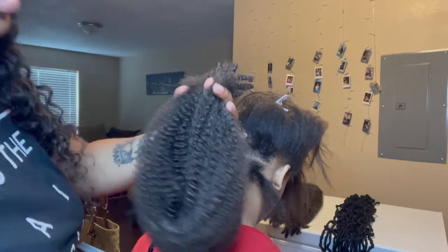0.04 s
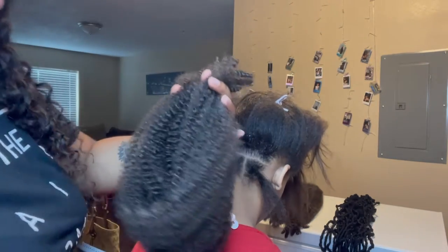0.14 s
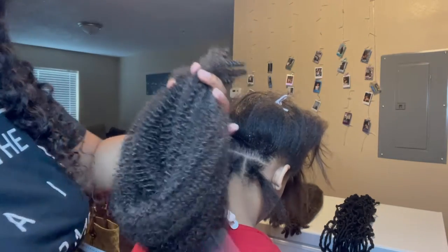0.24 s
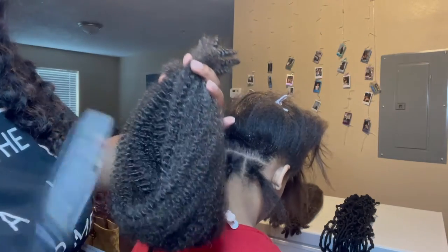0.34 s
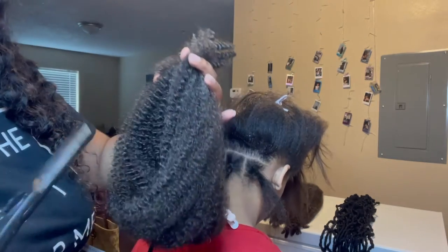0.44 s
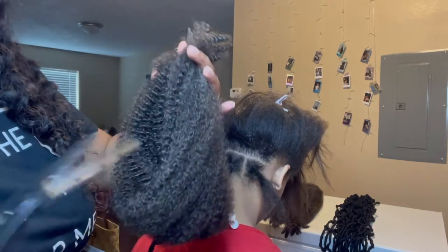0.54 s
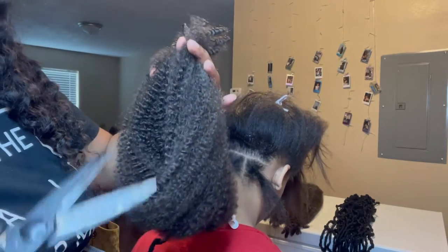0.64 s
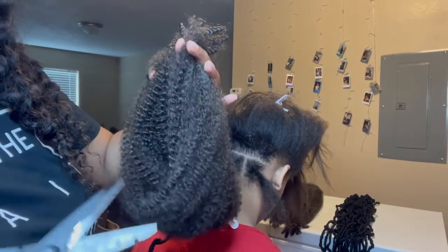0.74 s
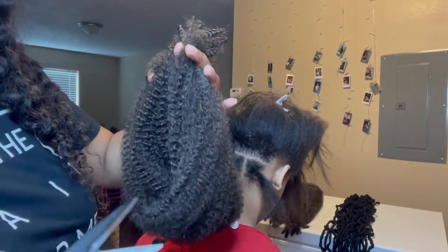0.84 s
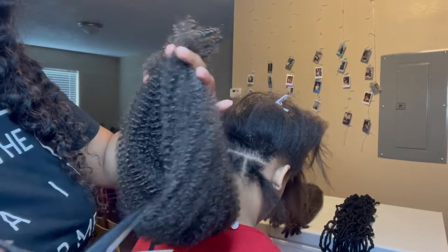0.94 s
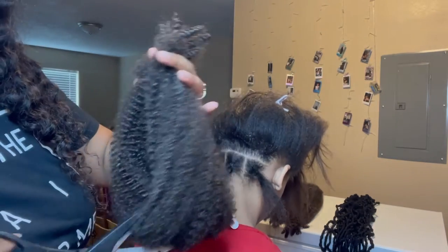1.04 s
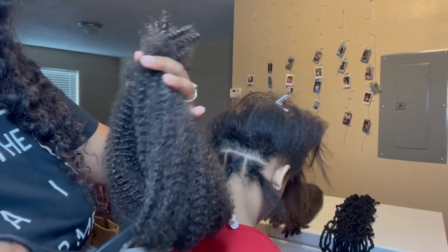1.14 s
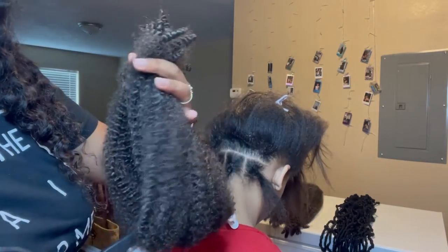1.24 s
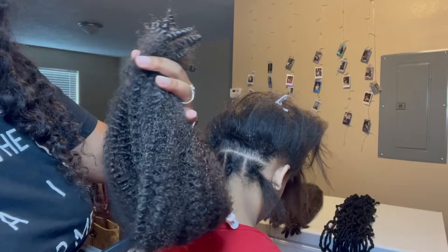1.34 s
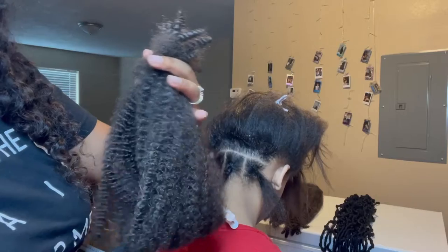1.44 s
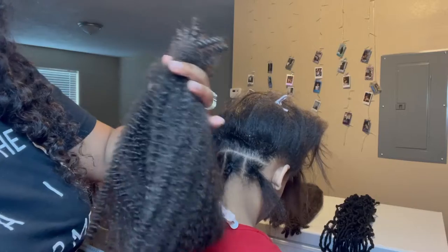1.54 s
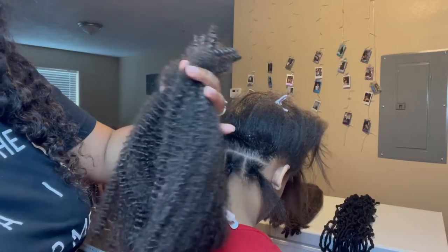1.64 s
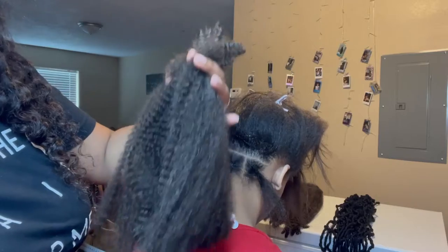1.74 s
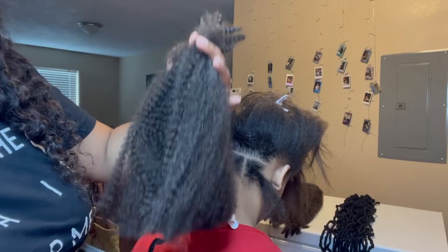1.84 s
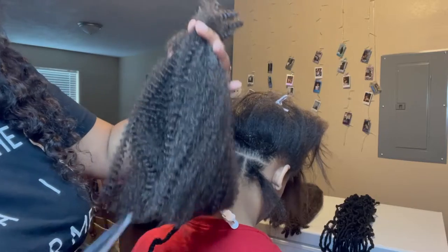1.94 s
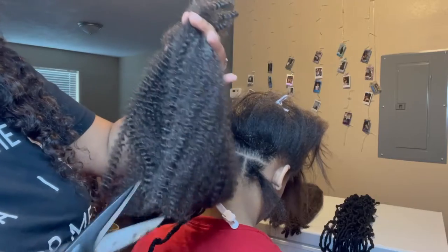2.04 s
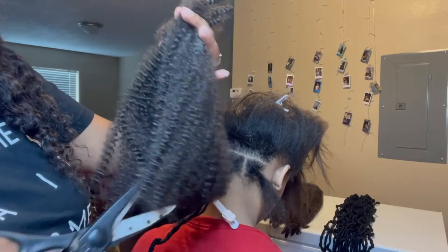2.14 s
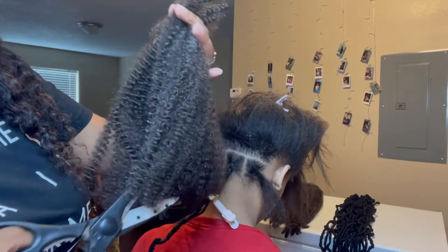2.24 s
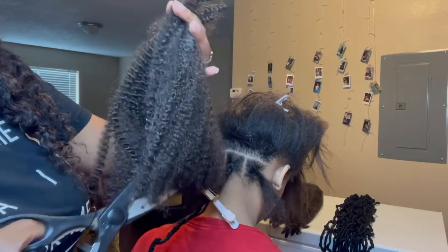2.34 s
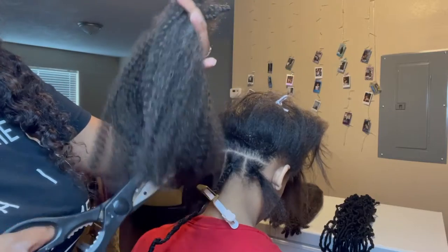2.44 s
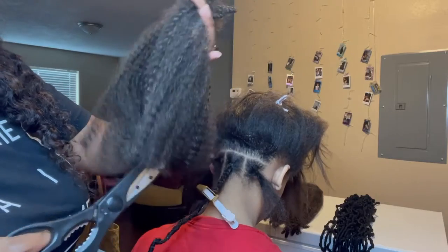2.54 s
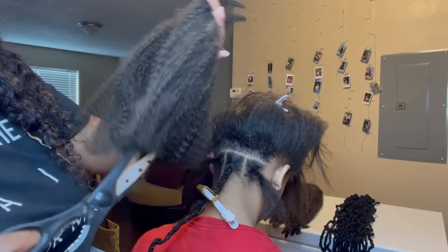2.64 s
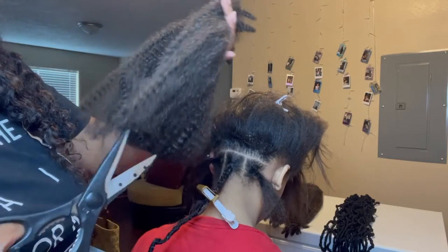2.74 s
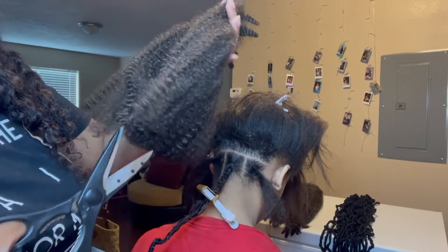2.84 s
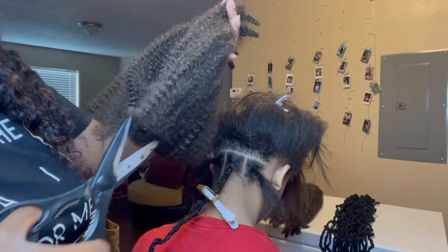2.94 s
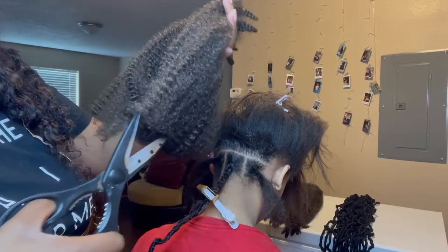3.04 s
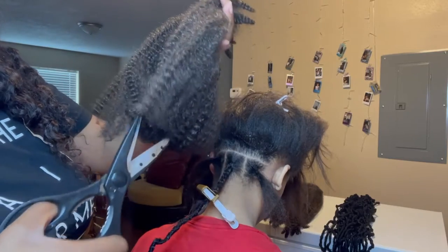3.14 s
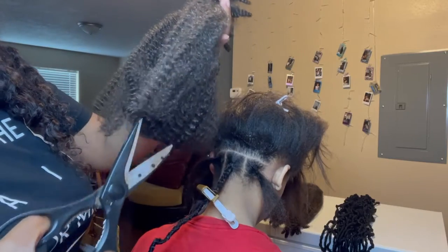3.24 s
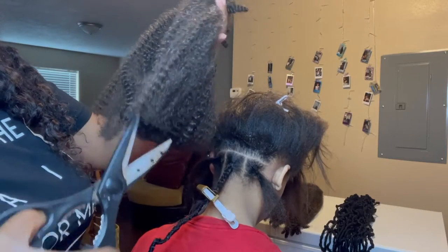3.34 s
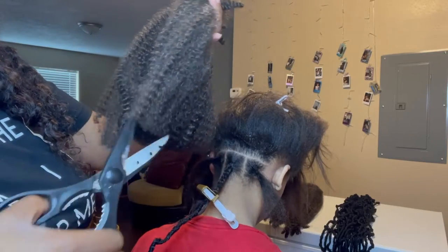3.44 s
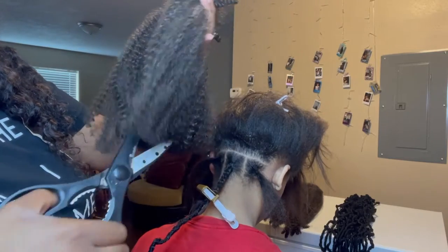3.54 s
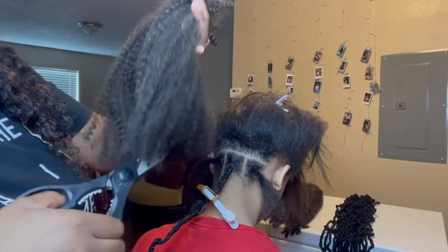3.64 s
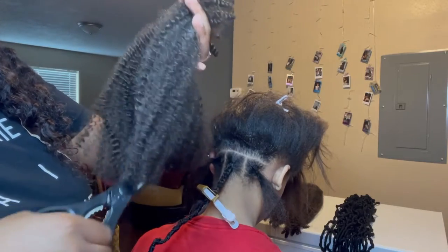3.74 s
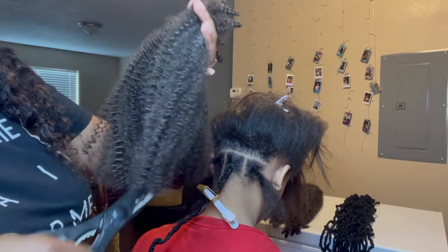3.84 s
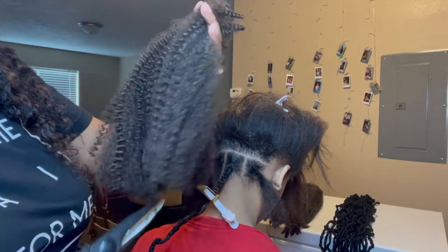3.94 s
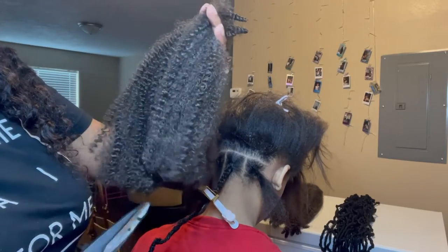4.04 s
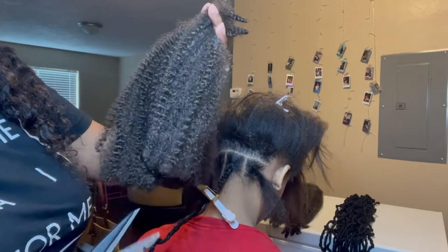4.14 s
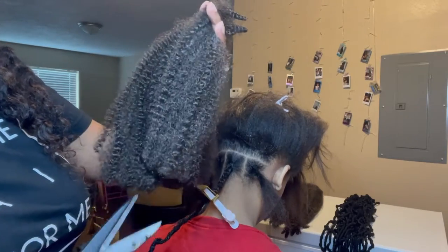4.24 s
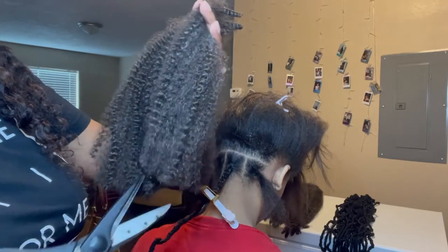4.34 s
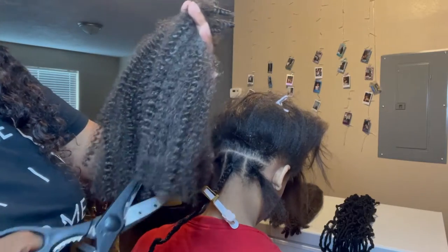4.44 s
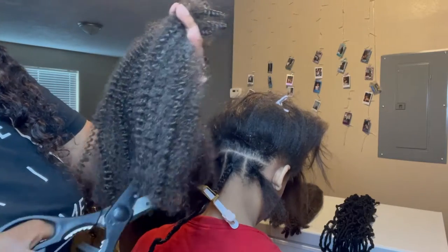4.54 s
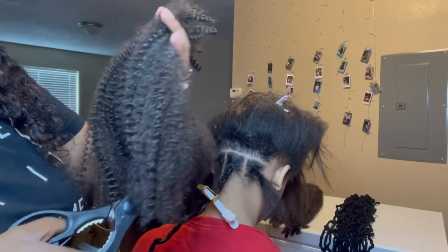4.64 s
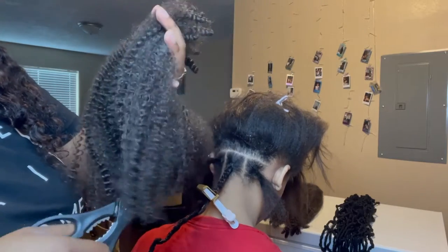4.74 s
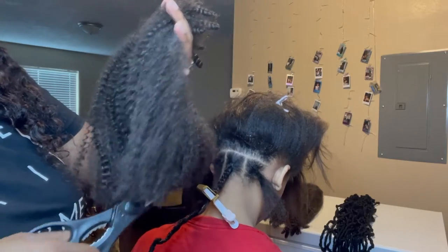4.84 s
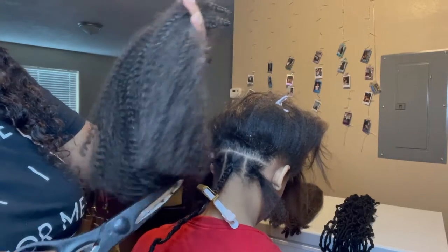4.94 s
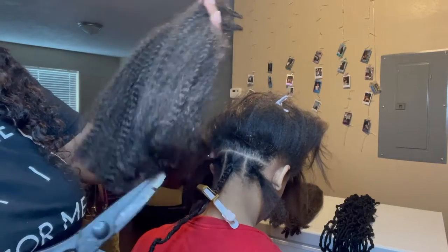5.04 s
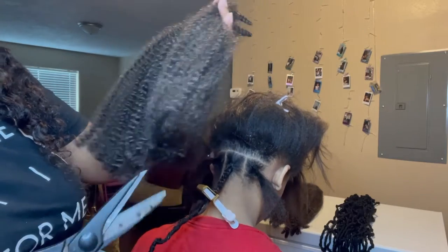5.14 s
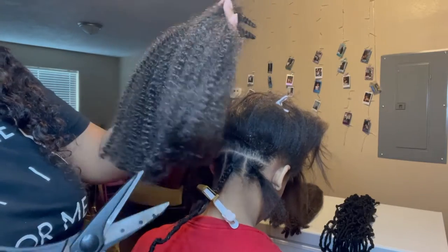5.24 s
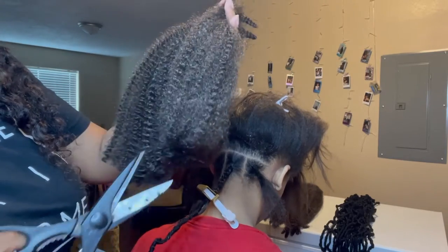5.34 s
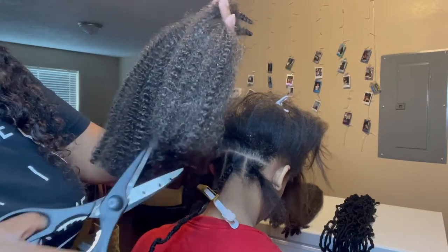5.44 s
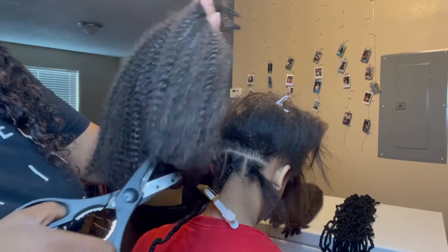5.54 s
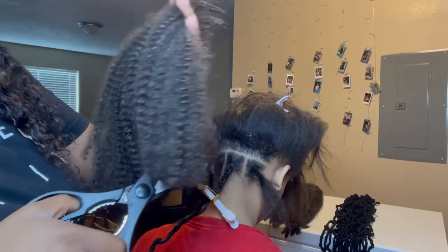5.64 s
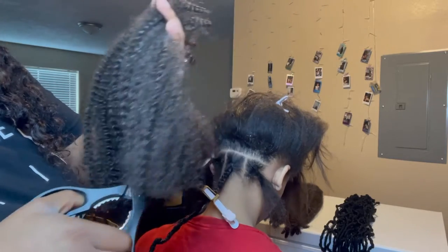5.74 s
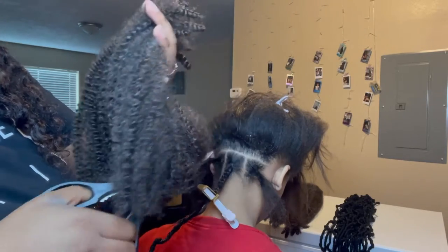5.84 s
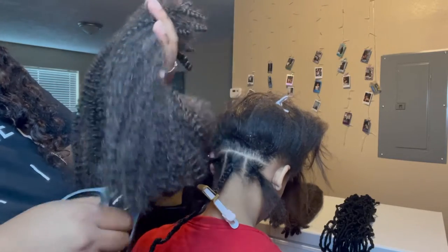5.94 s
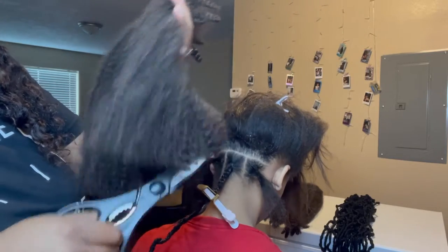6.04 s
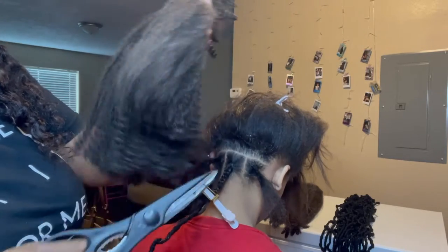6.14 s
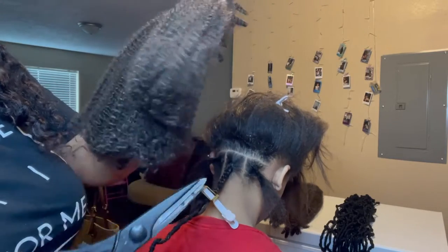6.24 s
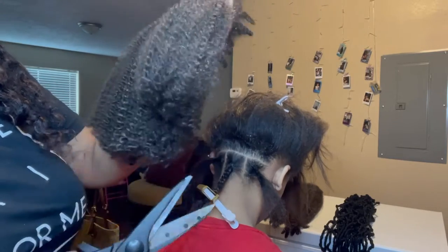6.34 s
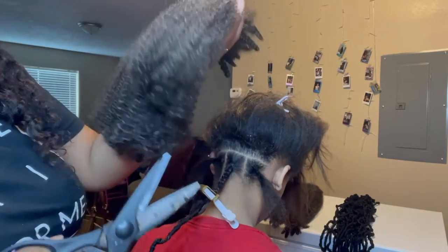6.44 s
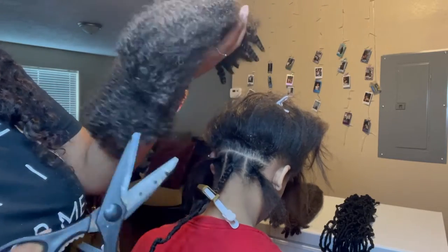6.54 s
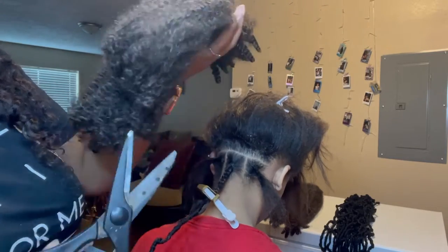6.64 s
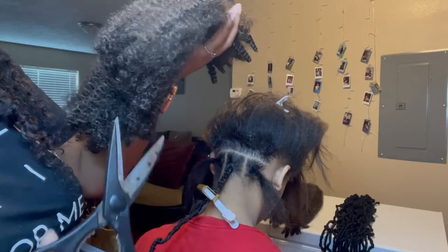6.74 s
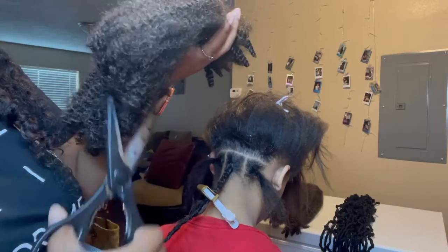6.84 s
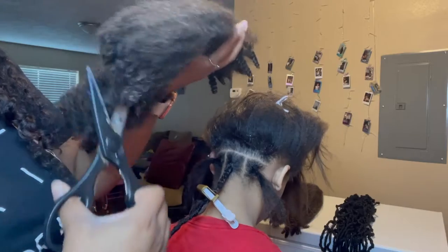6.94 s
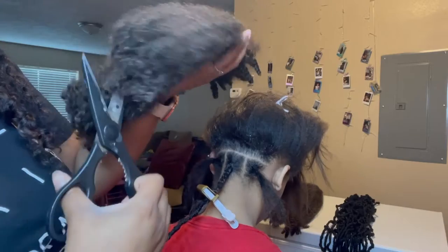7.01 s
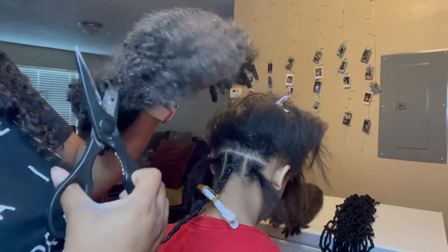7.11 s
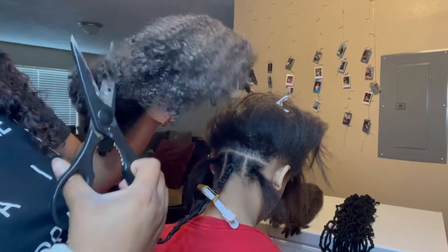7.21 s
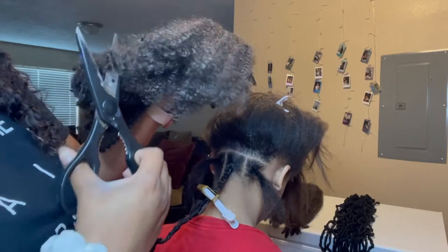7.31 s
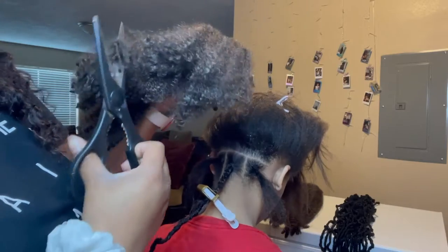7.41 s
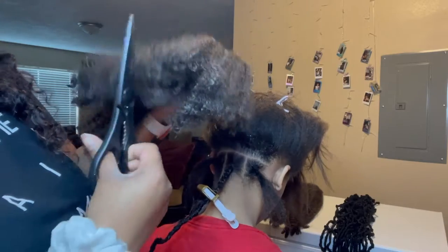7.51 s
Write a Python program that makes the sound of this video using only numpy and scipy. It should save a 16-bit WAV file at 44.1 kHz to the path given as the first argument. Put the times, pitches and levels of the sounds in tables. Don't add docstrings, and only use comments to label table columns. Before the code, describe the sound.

Scissors crunch slowly through a thick bundle of synthetic hair, each cut ending in a sharp steel snap, over faint unsteady hum indoors.

```python
import sys
import numpy as np
from scipy import signal
from scipy.fft import rfft, irfft, next_fast_len
from scipy.io import wavfile
from scipy.ndimage import uniform_filter1d

SR = 44100
rng = np.random.default_rng(int(sys.argv[2]) if len(sys.argv) > 2 else 0)


def magnitude_from_level(level_db):
    exponent = np.asarray(level_db, float) / 20
    return 10 ** exponent


def store_wav(level_fs):
    pcm = np.round(np.clip(np.atleast_2d(level_fs), -1, 1) * 32767)
    wavfile.write(sys.argv[1], SR, pcm.T.astype(np.int16))


N = 333837

PORT_LEAD_S = 0.0001716
# [t/s, scrape level/dB, handle body rel. level/dB]
REOPENINGS = [
    (1.7056, -53, -13),
    (4.0606, -51, -21.5),
    (5.0596, -52.5, -9),
    (6.242, -56, -11.5),
]
# [t/s, crack level/dB, knock rel. level/dB, ring f/Hz, ring level/dB]
CLOSINGS = [
    (1.53, -3, -20, 7613, -4),
    (3.874, -4, -18.5, 7500, 3),
    (4.8654, 1.5, -20.5, 7715, 3.5),
    (6.0157, 1.5, -22.5, 7640, -0.5),
    (7.458, -5.5, -20, 6150, 5.5),
]


def unit(x):
    return x / np.sqrt(np.mean(x ** 2) + 1e-20)


def along(points, hz):
    f, v = np.transpose(points)
    return np.interp(np.log(hz + 1), np.log(f + 1), v)


def curve(points):
    t_s, v = np.transpose(points)
    return np.interp(np.arange(N) / SR, t_s, v)


def wobble(rate_hz):
    knots = rng.standard_normal(int(N * rate_hz / SR) + 2)
    return np.interp(np.arange(N) * rate_hz / SR, np.arange(len(knots)), knots)


def filtered(x, response):
    m = next_fast_len(x.shape[-1] + 4096, True)
    return irfft(rfft(x, m) * response(np.fft.rfftfreq(m, 1 / SR)), m)[..., :x.shape[-1]]


def modes(table):
    def response(f):
        total = 0
        for k, (centre, width, db) in enumerate(table):
            damping = 1j * f * width
            total = total + (-1) ** k * magnitude_from_level(db) * damping / (centre * centre - f * f + damping)
        return total
    return response


def hiss(spectrum):
    return filtered(rng.standard_normal((2, N)), lambda hz: magnitude_from_level(along(spectrum, hz)) * np.sqrt(SR / 2))


def crackle(spread_db, clump_db, patchy_db):
    sizes = magnitude_from_level(spread_db * rng.exponential(size=N) + clump_db * wobble(350))
    z = signal.stft(rng.standard_normal((2, N)) * sizes, nperseg=128)[2]
    field = uniform_filter1d(rng.standard_normal(z.shape[1:]), size=3, axis=0)
    field = uniform_filter1d(field, size=9, axis=1)
    return signal.istft(z * magnitude_from_level(patchy_db * unit(field)), nperseg=128)[1][:, :N]


def shearing():
    # [full pressure t/s, held/s, first level/dB, last level/dB, body rel. level/dB]
    strokes = [(0, 0.11, -70, -76.5, -5), (.13, 0.013, -62, -68, -11.5), (.236, 0.16, -75, -83, -6),
               (1.2, 0.031, -73.5, -65, -11), (1.251, 0.065, -58, -45, -18),
               (1.914, 0.075, -92.5, -94, 22.5), (2.36, .035, -81, -85, -7),
               (2.621, 0.043, -71.5, -75, -10), (3.663, 0.066, -58, -57, -14),
               (3.738, 0.078, -48.5, -65, -11), (4.69, .03, -50.5, -51.5, -17.5),
               (4.72, 0.15, -48.5, -46.5, -17), (5.883, .046, -51, -48, -12),
               (5.968, .03, -63.5, -60.5, -17), (6.481, .04, -82, -85, -3), (6.65, 0.48, -100, -101, 20.5),
               (7.36, 0.039, -80, -63.5, -18), (7.42, 0.027, -48.5, -44.5, -16)]
    bite_db_per_s, spring_db_per_s, let_go_db_per_s = 698, 2200, 290
    t = np.arange(N) / SR
    bright, low = np.zeros(N), np.zeros(N)
    pressed = [(*row, bite_db_per_s) for row in strokes]
    pressed += [(s, 0, db, db, body_db, spring_db_per_s) for s, db, body_db in REOPENINGS]
    for s, held_s, first_db, last_db, body_db, onset_db_per_s in pressed:
        end = s + max(held_s, .001)
        levels_db = [first_db - onset_db_per_s, first_db, last_db, last_db - let_go_db_per_s]
        gain = magnitude_from_level(np.interp(t, [s - 1, s, end, end + 1], levels_db))
        bright += gain ** 2
        low += gain * magnitude_from_level(body_db)
    return bright, magnitude_from_level(-16) ** 2 * bright, low


def giving_way():
    # [t/s, level/dB, rise/ms, fall/ms]
    slips = [(0.1435, -61, 50, 11), (1.2213, -58.5, 4.9, 5.1), (1.3064, -41, 8.3, 7.6),
             (1.3378, -39.5, 5.6, 3.5), (1.371, -48, 4.8, 9.9), (1.721, -47, 20.4, 15),
             (3.6778, -56.5, 2.7, 9.9), (3.7455, -39, 15, 4.9), (3.7751, -42.5, 3.4, 7.0),
             (3.7935, -39.5, 6, 6.7), (4.7168, -36.5, 4.1, 13), (4.7426, -36.5, 3.6, 4.9),
             (4.7884, -48.5, 1.6, 9.1), (4.8252, -43.5, 9, 26), (5.8676, -52, 2.6, 27),
             (5.9346, -37, 28, 5.8), (6.2625, -47.5, 3.56, 13.6)]
    # [t/s, level/dB, dull rel. level/dB]
    ticks = [(0.7473, -47, -14), (1.1961, -67, -22), (1.3532, -43.5, -10), (1.4696, -56, -17),
             (1.4849, -35, -28), (1.5174, -24.5, -23.5), (2.606, -69, -3), (2.628, -69, 1),
             (3.8047, -38.5, -11), (4.688, -40, -34), (4.7792, -42, -9.5), (5.522, -68, -2),
             (5.885, -45, -13.5), (1.39, -52.5, -14.5), (1.288, -46, -19.5), (1.3, -38.5, -19),
             (4.68, -52.5, -20), (6.5254, -63, -10), (6.5746, -66, -24), (6.702, -60, -14),
             (7.357, -68.5, -16), (7.406, -52.5, -25), (7.3863, -56.5, -26)]
    # [t/s, level/dB, rise/ms, fall/ms, dull rel. level/dB]
    rush = [
        (0, -69, 1, 160, 1.5),
        (0.469, -35.5, 1.7, 2.7, -5.5),
        (.478, -30.5, 5.2, 4, -13.5),
        (0.499, -45.5, 5.5, 7.5, -7),
        (1.318, -35, 3.36, 4.4, -21),
        (2.682, -63.5, 10.8, 9, -18),
        (3.859, -32, 4.1, 4.05, -21.5),
        (6.0, -39.5, 1.76, 3.6, -17),
    ]
    # [t/s, level/dB, rise/ms]
    last = [
        (1.53, -15.5, 2.46),
        (3.872, -19.5, 9),
        (4.8654, -15.5, 5.4),
        (6.0152, -13, 4.7),
        (7.454, -21.5, 5),
    ]
    slip_dull_db, shake_db = -14, -13.5
    catches = [(*row, slip_dull_db) for row in slips]
    catches += [(s, db, 1.3, 2.6, dull_db) for s, db, dull_db in ticks]  # rise/ms, fall/ms
    catches += [(s, db + 9, 6.2, 11.6, -6) for s, db, _ in REOPENINGS]
    rushes = rush + [(*row, 0.98, -22) for row in last]

    t = np.arange(N) / SR
    bright, dull, low = np.zeros((3, N))
    for table, abruptness in (catches, 2), (rushes, 1):
        for s, db, rise_ms, fall_ms, dull_db in table:
            near = slice(max(round((s - .1) * SR), 0), round((s + .1) * SR))
            ms = 1000 * (t[near] - s)
            before = np.abs(ms / max(rise_ms, .2)) ** abruptness
            after = ms / max(fall_ms, .2)
            shape = magnitude_from_level(db - 9.1 * np.where(ms < 0, before, after))
            bright[near] += shape ** 2
            dull[near] += (shape * magnitude_from_level(dull_db)) ** 2
            if abruptness > 1:
                low[near] += shape * magnitude_from_level(dull_db + shake_db)
    return bright, dull, low


def fibres():
    # [f/Hz, density/dB per Hz]
    fibre_spectrum = [(1200, -33.5), (2000, -16.5), (3400, -16), (5200, -7.5), (6500, -6.5), (8500, -3),
                      (11000, -7.5), (13300, -6.5), (15600, -2), (16200, -30)]
    # [f/Hz, width/Hz, level/dB]
    blades = [(2874, 310, -8.5), (4400, 1000, -13.5), (6500, 600, -5), (8273, 900, -8.5),
              (10600, 1000, -8.5), (13200, 1100, -9)]
    # [f/Hz, density/dB per Hz]
    dull_spectrum = [(1000, -28.5), (1800, -8), (2600, 0.5), (3600, -3), (5500, -21.5)]
    # [f/Hz, density/dB per Hz]
    body_spectrum = [(200, -29.5), (400, 0), (750, -7.5), (1150, -13.5), (1700, -0.5), (2400, -25.5)]
    bright, dull, low = [slow + quick for slow, quick in zip(shearing(), giving_way())]
    grains = crackle(spread_db=3, clump_db=2.7, patchy_db=4.0)
    steel = unit(filtered(grains, lambda hz: magnitude_from_level(along(fibre_spectrum, hz)) * (1 + modes(blades)(hz))))
    blunt = unit(filtered(grains[:, ::-1], lambda hz: magnitude_from_level(along(dull_spectrum, hz))))
    body = unit(hiss(body_spectrum))
    return magnitude_from_level(-2.5) * (np.sqrt(bright) * steel + np.sqrt(dull) * blunt + low * body)


def snaps():
    # [t/s, crack level/dB, knock rel. level/dB, ring f/Hz, ring level/dB]
    pings = [ (0.478, -33.5, -26, 2400, -4), (0.748, -41.5, -20.5, 7840, -1), (1.195, -48, -43, 10280, 19),
             (2.627, -50, -37.5, 10500, -10), (3.031, -63, -40, 4008, 40.5), (4.06, -45, -30, 2320, 22),
             (5.0577, -41.5, -28.5, 6500, -1.5), (6.481, -62, -42, 3803, 24), (6.525, -49, -38, 6700, 5.5),
             (6.5744, -48.5, -39.5, 8100, 7), (6.702, -49, -47, 6920, 9)]
    # [f/Hz, density/dB per Hz]
    crack_spectrum = [(1200, -24.5), (2600, -6), (4300, -2), (6000, -3.5), (8000, -4.5), (9500, 1),
                      (12000, -7.5), (15500, -9), (16800, -25.5), (17200, -69.5)]
    # [f/Hz, width/Hz, level/dB]
    handles = [(429.2, 110, -8.5), (694, 71, -6), (1047, 160, -3.5), (1566, 250, -8.5), (2400, 200, 0)]
    out = np.zeros((2, N))
    t = np.arange(2048) / SR - .003
    chatter = np.where(t < 0, magnitude_from_level(60 * t / 0.0039), magnitude_from_level(-60 * t / 0.0055))
    push = np.clip(1 - np.abs(t + .0005) / .00017, 0, 1)
    pushes = np.array([push, np.roll(push, -round(2 * PORT_LEAD_S * SR))])
    knock = filtered(pushes, lambda f: modes(handles)(f) * f / (f + 400))
    knock = knock / np.abs(knock).max()
    for s, db, knock_db, ring_hz, ring_db in CLOSINGS + pings:
        burst = rng.standard_normal((2, len(t))) * chatter * [[.2], [.3]]
        burst[0, np.argmax(t > 0)] -= 2.2
        ring = modes([(ring_hz, ring_hz / 10, ring_db)])
        crack = filtered(burst, lambda f: magnitude_from_level(along(crack_spectrum, f)) * (0.5 + ring(f)))
        hit = crack / np.abs(crack[0]).max() + magnitude_from_level(knock_db) * knock
        out[:, round((s + t[0]) * SR):][:, :len(t)] += magnitude_from_level(db) * hit
    return out


def all_round(x):
    hz, _, z = signal.stft(x, SR, nperseg=1024)
    power = np.abs(z) ** 2
    fine, broad = (np.abs(uniform_filter1d(power, size=size, axis=0)) + 1e-20 for size in (5, 41))
    evened = z * np.where(hz[:, None] > 1800, np.sqrt(broad / fine), 1)
    return signal.istft(evened, SR, nperseg=1024)[1][:N]


def room(x, count=7):
    # [f/Hz, t60/s]
    decay = [(300, 0.61), (1000, 0.46), (3000, .45), (7000, 0.43), (12000, 0.3), (16000, 0.14)]
    # [delay/ms, level/dB]
    echoes = [(2.1, -8), (3.4, -13), (6.2, -12.5), (8.3, -19.5), (11, -19), (15, -20.5)]
    out, size = np.zeros((2, N + SR)), N // count + 1
    for start in range(0, N, size):
        hz, t, z = signal.stft(rng.standard_normal((2, SR // 2)), SR, nperseg=256)
        fading = magnitude_from_level(-60 * t / along(decay, hz)[:, None]) + 1.3 * magnitude_from_level(-60 * t / 0.12)
        tail = signal.istft(z * fading, SR, nperseg=256)[1]
        build_up = np.clip(np.arange(tail.shape[1]) / (0.012 * SR), 0, 1)
        tail = magnitude_from_level(-7) * tail / np.linalg.norm(tail[0]) * build_up
        for ms, db in echoes:
            delays = np.round((ms + rng.normal(0, .3, size=2)) * SR / 1000).astype(int)
            tail[:, delays] += magnitude_from_level(db) * np.eye(2)
        wet = signal.fftconvolve(x[None, start:start + size], tail, axes=1)
        out[:, start:start + wet.shape[1]] += wet
    return out[:, :N]


def ports(pair, likeness, lock):
    def response(hz):
        turn = 2 * np.pi * hz * PORT_LEAD_S
        locked = np.clip(lock * (hz - 7200) / 1000, 0, min(lock, 1))
        alike = np.clip(along(likeness, hz), 0, 1)
        alike += (1 - alike) * locked * np.clip(1.25 * np.cos(turn) ** 2, 0, .985)
        phase = turn - .6 * locked * np.sin(2 * turn)
        return np.exp(-1j * phase) * [alike, np.sqrt(1 - alike ** 2)]
    return np.array([pair[0], filtered(pair, response).sum(axis=0)])


def duct_air():
    # [t/s, level/dB, half length/s]
    swells = [(.29, -66.5, 0.028), (.74, -65.5, 0.11), (1.33, -69, 0.05), (1.95, -63, 0.15),
              (2.34, -73.5, 0.1), (2.97, -67, 0.12), (3.22, -63.5, 0.039), (3.73, -75.5, 0.042),
              (3.95, -64, 0.22), (4.4, -71, .12), (5.05, -60.5, 0.15), (5.92, -63.5, 0.071),
              (6.2, -68.5, 0.17), (6.65, -72.5, 0.085), (7.04, -64, 0.22)]
    # [f/Hz, density/dB per Hz]
    duct_spectrum = [(90, -34), (140, 0.5), (200, -5), (290, 0), (350, 5), (420, -6), (600, -43.5)]
    thuds = [(s, db - 56, 0.01) for s, db, *_ in CLOSINGS]
    t = np.arange(N) / SR
    flow = magnitude_from_level(-83.5)
    for s, db, half_s in swells + thuds:
        flow = flow + magnitude_from_level(db - 12 * np.abs(t - s) / half_s)
    return flow * magnitude_from_level(2.0 * wobble(15)) * unit(hiss(duct_spectrum))


def mains_hum():
    # [t/s, level/dB]
    hum_level = [(0.0, -64.5), (0.31, -53.5), (0.38, -92), (0.61, -61), (1.9, -59.5), (2.19, -69),
                 (2.32, -50.5), (2.55, -70), (2.61, -54), (3.6, -58), (5.25, -52), (5.31, -73.5),
                 (5.35, -60), (6.24, -58), (6.35, -50), (6.45, -58.5), (7.53, -59), (7.57, -69)]
    phase = 2 * np.pi * np.cumsum(59.3 + 3.1 * wobble(15)) / SR
    level_db = uniform_filter1d(curve(hum_level) + 4.5 * wobble(11), size=2200) - 0.4
    return magnitude_from_level(level_db) * np.sqrt(2) * np.array([np.sin(phase), np.cos(phase)])


def appliance_tones():
    # [f/Hz, rms level/dB]
    tones = [(533, -81.5), (770, -99), (1141, -101), (1900, -99), (2433, -102), (5270, -109)]
    t, out = np.arange(N) / SR, np.zeros(N)
    for hz, db in tones:
        level = magnitude_from_level(db + 2.0 * wobble(30)) * np.sqrt(2)
        out += level * np.sin(2 * np.pi * hz * t + hz / 1400 * wobble(28))
    return out


def noise_floor():
    # [f/Hz, density/dB per Hz]
    floor_spectrum = [(20, -105), (45, -85.5), (70, -90.5), (100, -89), (180, -99), (420, -106),
                      (620, -108), (1000, -115), (2200, -116), (3400, -122), (6500, -125), (12000, -129),
                      (13300, -131), (13900, -150)]
    return magnitude_from_level(0.8 * wobble(3)) * hiss(floor_spectrum)


def scene():
    # [t/s, left-right level/dB]
    pan = [(.45, 2.5), (.75, -4), (1.6, 1), (3.8, 0), (4.1, -3.5), (4.9, 1), (6, 0.5), (6.3, 1.5),
           (7.45, 3.5)]
    # [f/Hz, likeness 0-1]
    near_alike = [(300, 1), (1500, 1), (4000, 0.1), (7000, 0.9), (8200, 0), (16000, 0.84)]
    # [f/Hz, likeness 0-1]
    diffuse_alike = [(60, 0.95), (130, 0.5), (300, 0.2), (1000, 0), (3000, 0.01), (6800, 0), (8200, 0.12),
                     (16000, 0.3)]
    hair, steel = fibres(), snaps()
    sent = magnitude_from_level(-0.5) * hair[0] + magnitude_from_level(2.5) * steel[0]
    lean = magnitude_from_level(np.outer([.5, -.5], curve(pan)))
    direct = lean * ports(hair + steel, near_alike, lock=0.76)
    background = mains_hum() + appliance_tones() + duct_air() + noise_floor()
    return direct + ports(room(all_round(sent)) + background, diffuse_alike, lock=0.81)


def top_cut(x):
    return signal.sosfilt(signal.butter(12, 17130, fs=SR, output="sos"), x)


def record(dry):
    limited = dry / (1 + np.abs(dry / .9) ** 6) ** (1 / 6)
    balanced = limited * magnitude_from_level([[-0.2], [0.2]])
    mix = filtered(balanced, lambda hz: np.interp(hz, [15900, 16050, 16700, 16900], [1, .1, .1, 0]))
    return top_cut(mix)


dry = scene()
out = record(dry)
store_wav(out)
```